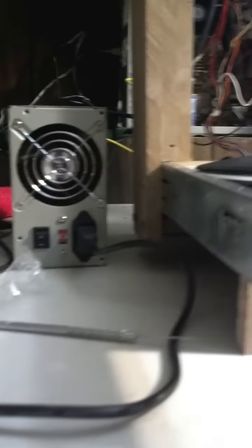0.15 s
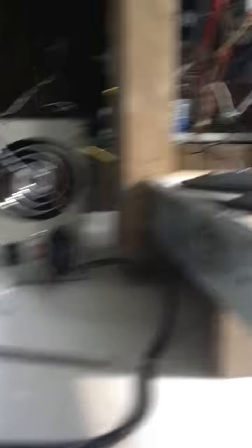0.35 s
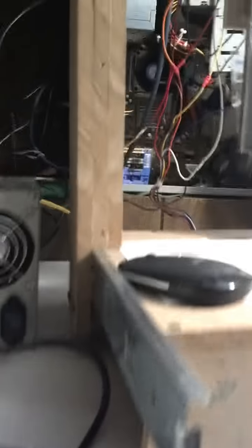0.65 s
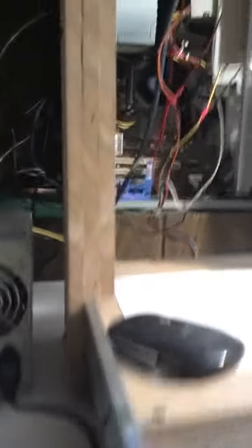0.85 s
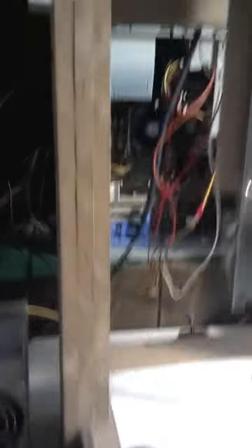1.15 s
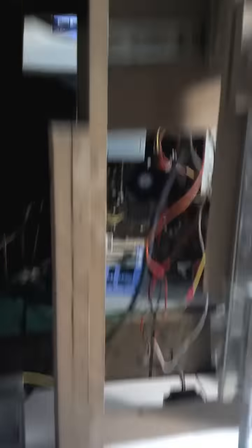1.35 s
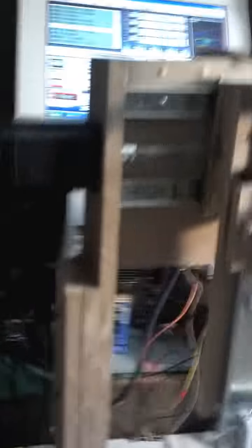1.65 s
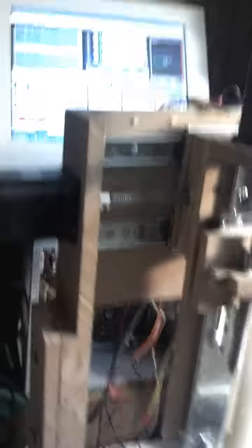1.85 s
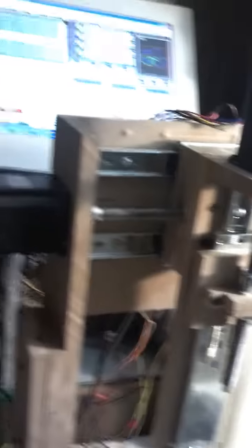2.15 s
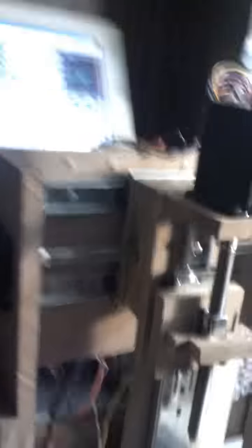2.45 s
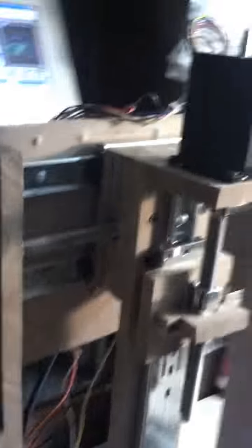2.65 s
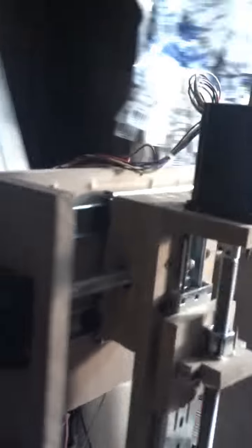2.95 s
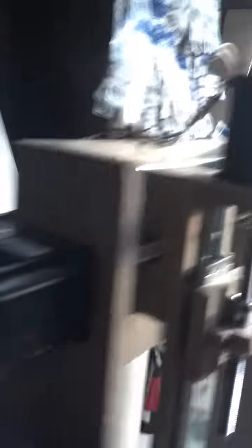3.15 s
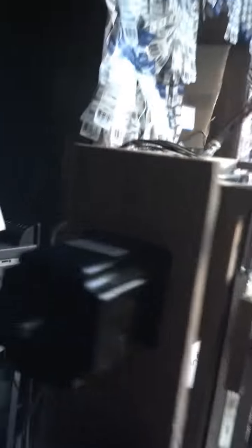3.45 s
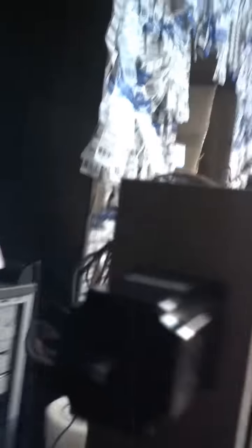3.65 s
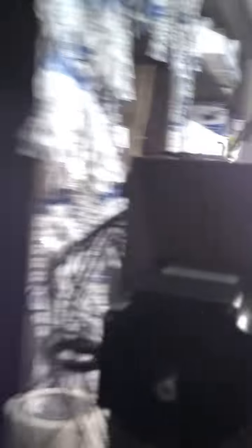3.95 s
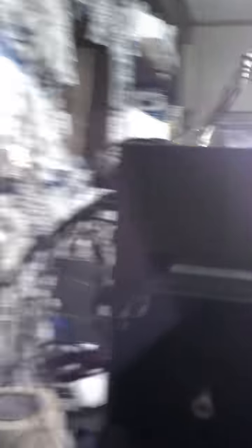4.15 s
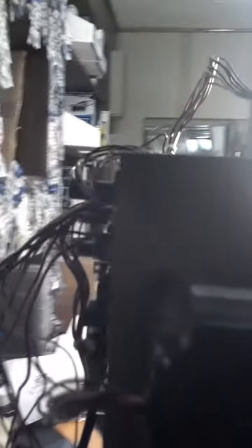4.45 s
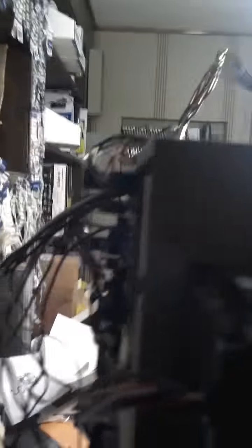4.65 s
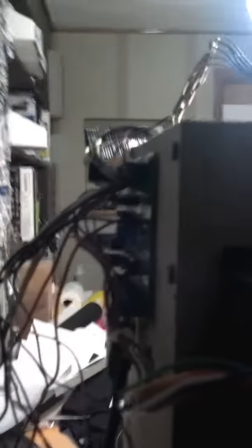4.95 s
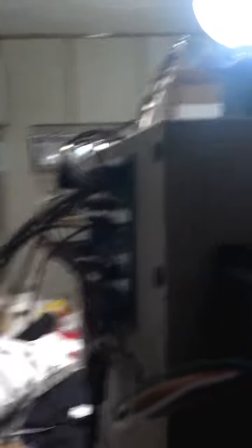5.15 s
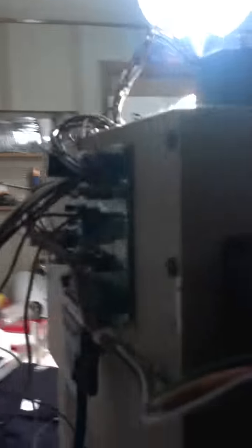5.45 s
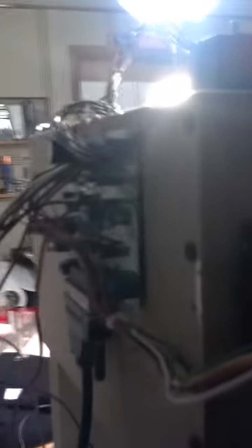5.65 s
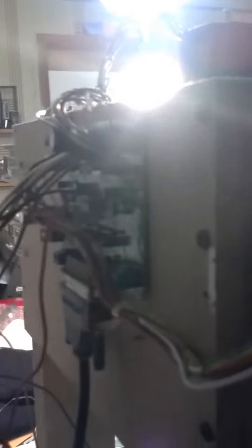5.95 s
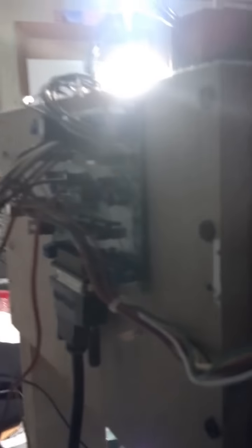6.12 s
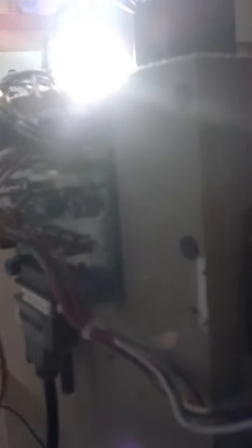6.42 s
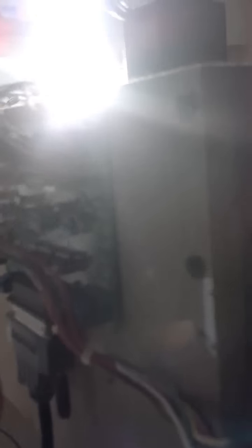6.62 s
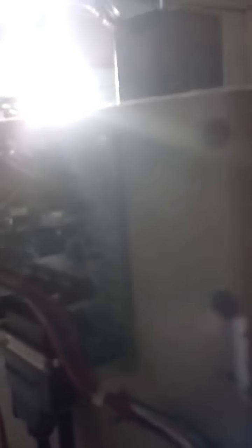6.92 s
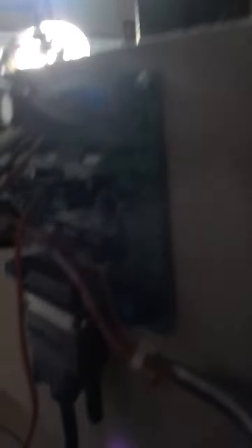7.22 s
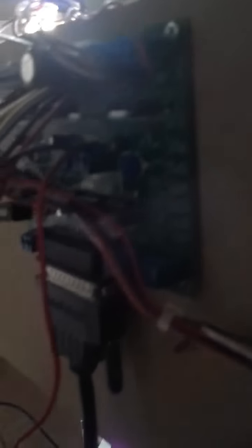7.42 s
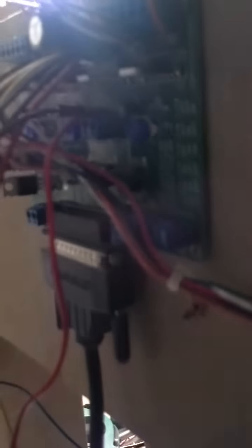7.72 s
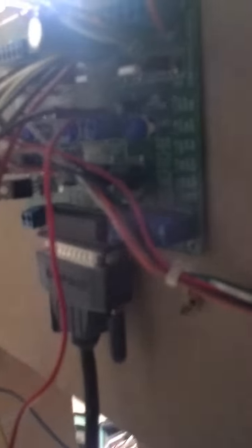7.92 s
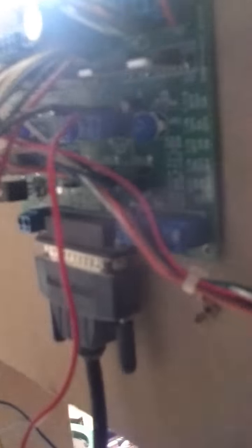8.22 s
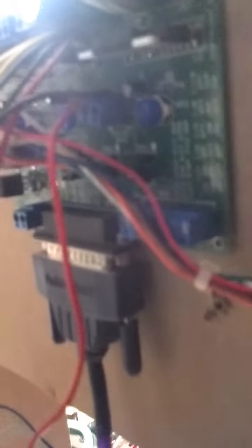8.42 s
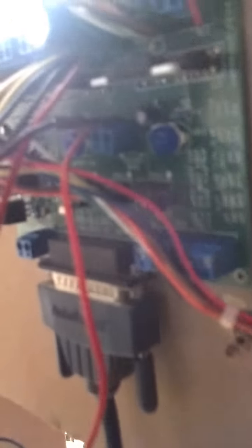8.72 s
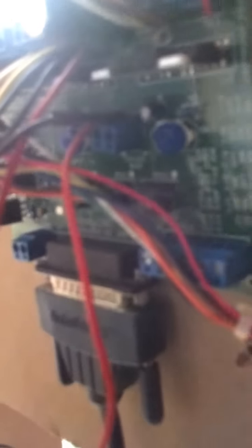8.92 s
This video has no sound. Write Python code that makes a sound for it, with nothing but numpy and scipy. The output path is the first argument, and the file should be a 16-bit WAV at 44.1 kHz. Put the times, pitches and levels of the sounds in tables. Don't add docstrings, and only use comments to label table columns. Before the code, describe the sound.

A gritty mechanical whine around 1.3 kilohertz runs, slides down and is replaced by another motor's rising tone; a finger taps the microphone. The tones swap again with a low table thud, then sharp rattles and metallic ringing cluster near six seconds. The motor winds down, pauses, then two voices bend in steps. Near, indoor, wide stereo sound with faint hum and thin hiss.

```python
import sys
import numpy as np
from scipy import signal
from scipy.fft import rfft, irfft, next_fast_len
from scipy.io import wavfile
from scipy.ndimage import uniform_filter1d, map_coordinates

SR = 44100
rng = np.random.default_rng(int(sys.argv[2]) if len(sys.argv) > 2 else 0)


def pcm_store(signal):
    levels = np.round(np.clip(np.atleast_2d(signal), -1, 1) * 32767)
    wavfile.write(sys.argv[1], SR, levels.astype(np.int16).T)


def ratio(d):
    e = np.asarray(d, float) / 20
    return 10 ** e


N = 400428
T = np.arange(N) / SR
HZ = np.fft.rfftfreq(2 * next_fast_len(N // 2 + SR // 4), 1 / SR)
SUM_ONLY = [[1], [0]]


def evened(x):
    return x / np.sqrt(np.mean(x ** 2) + 1e-20)


def read(points, hz):
    f, value = np.transpose(points)
    return np.interp(np.log(hz + 1), np.log(f + 1), value)


def curves(rows):
    s, *columns = np.transpose(rows)
    return [np.interp(T, s, column) for column in columns]


def spell(start_s, stop_s):
    return np.clip(np.minimum(T - start_s, stop_s - T) / .02 + .5, 0, 1)


def add(mix, s, sound):
    part = mix[round(s * SR):][:len(sound)]
    part += sound[:len(part)]


def colour(x, response):
    return irfft(rfft(x, 2 * len(HZ) - 2) * response)[..., :N]


def modes(table):
    return sum(ratio(db) / (1 + 2j * (HZ - hz) / width_hz) for hz, width_hz, db in table)


def slow(rate_hz):
    knots = rng.standard_normal(int(N / SR * rate_hz) + 2)
    return evened(np.interp(T, np.arange(len(knots)) / rate_hz, knots))


def noise(spectrum, flicker_db, rate_hz):
    z = colour(rng.standard_normal((2, N)), ratio(read(spectrum, HZ)))
    return evened(z) * ratio(flicker_db * slow(rate_hz))


def cycle(turns, orders, levels_db):
    place = np.linspace(0, 1, 8193)
    phase = rng.random(len(orders))
    wave = ratio(levels_db) @ np.cos(2 * np.pi * (np.outer(orders, place) + phase[:, None]))
    return np.sqrt(2) * map_coordinates(wave, [turns % 1 * (len(place) - 1)], order=1)


GRIP_HZ = 328


def step_orders(hz, levels, orders, waver_db):
    steps = np.cumsum(hz) / SR
    out = np.zeros(N)
    for level_db, lines in zip(levels, orders):
        multiple, db = np.transpose(lines)
        first = multiple[0]
        waver = waver_db * (slow(25) + 0.91 * slow(120)) + 1.63 * slow(70) * (first > 1.5)
        grip = 1 / (1 + (first >= 1) * (GRIP_HZ / (first * hz + 1)) ** 4)
        out += grip * ratio(level_db + waver) * cycle(steps / 8, np.round(8 * multiple), db)
    return out


STRONG_EDGES = [29, 31, 33, 46, 48, 89, 91, 95, 99]


def current_edges(steps, strong_db, edges_db):
    comb = np.arange(9, 112)
    comb_db = 3 * rng.standard_normal(len(comb)) - 4
    return ratio(edges_db) * cycle(steps / 4, np.r_[comb, STRONG_EDGES], np.r_[comb_db, strong_db])


def uneven_strands(turns, orders, spread_db):
    return cycle(turns, orders, spread_db * rng.standard_normal(len(orders)))


def backlash(steps):
    grain = signal.lfilter([.3], [1, -.7], rng.standard_normal(N))
    return evened(np.exp(-(steps % 1) / 0.34) * grain)


MOTORS_DB = -2


def frame_response(frame, floor_db, deaf_hz):
    radiates = 1 / (1 + (deaf_hz / (HZ + 1)) ** 6)
    ragged_db = 2.6 * evened(uniform_filter1d(rng.standard_normal(len(HZ)), 400))
    floor = ratio(floor_db) / (1 + (HZ / 3900) ** 8)
    return (floor + modes(frame)) * ratio(ragged_db + MOTORS_DB) * radiates


def motor(hz, levels, orders, frame, strong_db, edges_db, ramp_db, screw_db, rasp_db, waver_db, floor_db, deaf_hz):
    steps = np.cumsum(hz) / SR
    out = step_orders(hz, levels, orders, waver_db)
    out += current_edges(steps, strong_db, edges_db)
    out += ratio(levels[2] + ramp_db) * uneven_strands(steps / 4, np.arange(5, 48), 1.6)
    out += ratio(levels[0] + screw_db) * uneven_strands(steps / 32, np.arange(6, 76), 3)
    out += (ratio(levels[2] + rasp_db) + ratio(edges_db + 3.5)) * backlash(steps)
    return colour(out * np.clip(hz / 60, 0, 1), frame_response(frame, floor_db, deaf_hz))


# step_rate_multiple, level_db
X_ORDERS = [
    [(1, 2.5), (1.25, -31)],
    [(.5, 3.5), (.125, -3.5), (.25, -2), (.75, -27), (1.5, -20)],
    [(4, 7), (8, -3), (12, -25), (16, -22)],
    [(2, 1), (3, -7.5)],
]
# mode_hz, width_hz, peak_db
X_FRAME = [(565, 77, 14.5), (710, 62, 3.5), (918, 67, 24), (1004, 8.4, -6.5), (1307.6, 89, 6.5),
           (1600, 180, 4), (1820, 290, 11.5), (2300, 120, 11), (2562, 34, 0.5), (3100, 110, -0.5),
           (4040, 1300, 0), (8700, 1700, -6), (15750, 1500, -3)]
X_EDGES_DB = [3, 4, 4, 5, 0.1, 4, 12, 8, 4]


def x_motor(hz, levels):
    return motor(hz, levels, X_ORDERS, X_FRAME, X_EDGES_DB, edges_db=-77.5, ramp_db=-25.5, screw_db=-48.5,
                 rasp_db=-12.5, waver_db=1.0, floor_db=-28.5, deaf_hz=430)


# step_rate_multiple, level_db
Y_ORDERS = [
    [(1, 0.5), (1.25, -38)],
    [(.125, 2.5), (.25, -11), (.5, -24.5), (.75, -39), (1.5, -38.5), (2, -40)],
    [(4, 5.5), (8, -3.5), (12, -8), (16, -10)],
    [(2, 1), (3, 1.5), (5, -9), (6, -12), (7, -3)],
]
# mode_hz, width_hz, peak_db
Y_FRAME = [(407, 110, -4), (670, 28, 8.5), (953, 30, 6), (1103, 150, 8), (1313, 76, 12), (1458, 294, 15),
           (1963, 54, 18), (2254, 19, 15.5), (3030, 55, -10), (3273, 70, 7.5), (3684, 37, 7),
           (9530, 610, 0), (15400, 2700, -4.5)]
Y_EDGES_DB = [8.8, 9.9, 0.1, 6, 5, 8, 11, 0.1, 5]


def y_motor(hz, levels):
    return motor(hz, levels, Y_ORDERS, Y_FRAME, Y_EDGES_DB, edges_db=-79.5, ramp_db=-44.0, screw_db=-40,
                 rasp_db=-7.5, waver_db=0.9, floor_db=1.0, deaf_hz=130)


FULL_HZ, RAMP_S, TOGETHER_S = 1279, 0.5, 7.68


def axis(moves, outline_hz, near, laws, usual_db):
    hz = outline_hz + sum(FULL_HZ * np.clip(np.minimum(T - a, b - T) / RAMP_S, 0, 1) for a, b in moves)
    both = spell(TOGETHER_S, N / SR + 1)
    ramping = uniform_filter1d((abs(np.gradient(hz)) * SR > 500) * (1 - both), size=2000)
    closer_db = curves(near)[0] - usual_db
    return hz, [usual_db + rest_db + slope_db * hz / 1000 + ramp_db * ramping + both_db * both + share * closer_db
                for rest_db, slope_db, ramp_db, both_db, share in laws]


THROB_DB, THROB_TURN, THROB_SHARP, SHAFT_STEPS = 2.5, 0.14, 3.9, 200


def throb(hz):
    turn = np.cos(np.pi * (np.cumsum(hz) / SR / SHAFT_STEPS - THROB_TURN)) ** 2
    return THROB_DB * (turn ** THROB_SHARP - .3)


# start_s, stop_s
X_MOVES = [(-0.405, 2.126), (4.851, 7.188)]
Y_MOVES = [(2.129, 4.851)]
# corner_s, x_step_hz, y_step_hz, x_overtone_strain_db, y_microstep_strain_db
OUTLINE = [(7.36, 0, 0, 1, -3), (7.68, 808.5, 0, -3, -3), (7.725, 695, 121.5, -14.5, -18),
           (7.76, 605, 211.5, -15, -14), (7.805, 491.5, 328, -23, -5.5), (7.85, 390.5, 400, -19, -23),
           (7.91, 477.5, 397, -7, -19.5), (7.94, 539.5, 392, 3.5, -7.5), (8.005, 678.5, 383, 11.5, -5),
           (8.06, 920.5, 511, -5, -4.5), (8.232, 984.5, 505, 4.5, -1), (8.29, 788.5, 391, -2, 5),
           (8.39, 852, 363.5, 2.5, -6), (8.397, 815, 332.5, 1, 2), (8.47, 904, 319.5, -5, 1),
           (8.54, 982, 304.5, 7, -0.5), (8.548, 1032.5, 319, -13, 0), (8.63, 1156.5, 286, -14, 0),
           (8.71, 1279.5, 255.5, -6.5, -1.5), (8.88, 1280, 257.5, -2, 0.7), (9.08, 1506.5, 170, -10, -6.5)]
# time_s, level_db
X_NEAR = [(0, -64.5), (0.602, -72.5), (1.0, -64), (1.249, -58.5), (1.6, -64.5), (2.1, -55.5), (4.9, -64),
          (5.3, -57.5), (6.001, -60), (6.7, -57.5), (7.2, -58.5), (7.601, -54), (7.9, -54.5), (8.1, -61),
          (8.4, -61), (8.65, -51), (8.849, -47), (9.08, -45.5)]
Y_NEAR = [(2.128, -48), (2.399, -48), (2.7, -52.5), (3.1, -46), (3.4, -43), (3.8, -45), (4.2, -44),
          (4.4, -43.5), (4.6, -41), (4.85, -50.5), (7.7, -40.5), (7.9, -53), (8.1, -49.5), (8.33, -61.5),
          (8.43, -50.5), (8.7, -55.5), (8.852, -60), (9.08, -56.5)]
# rest_db, slope_db_per_khz, ramping_db, both_axes_db, nearness_share
X_LAWS = [
    (0.5, -1.5, 7.5, 9.5, 1),
    (0, 1.5, -4.5, -14.5, 1),
    (7.5, -26.5, -3, 8, 0.35),
    (-13.5, 3.5, -3, 20, 0.16),
    (1, -1, -3, 6, 0.067),
    (16.5, -20.5, -4.5, 3, 0.088),
]
Y_LAWS = [
    (-3.5, 0.5, -0.21, 8, 0.99),
    (7.5, -2, -1.5, 19.5, 0.73),
    (6.5, -24.5, 0.1, 5.5, 0.78),
    (-14.5, -3, -0.5, -10.5, 0.78),
    (-2.5, -4.5, 0.18, -29, 0.66),
    (7, -4, -0.5, -1, 0.42),
]
# time_s, x_step_db, x_slow_db, x_microstep_db, y_step_db
LOAD = [(0.1, 1, -5.5, 10, 0), (.6, 2.5, 1, 0, 0), (1.1, 7.5, -6.5, -6, 0), (1.55, 3, 5, 6, 0),
        (1.75, 2.5, -4, 11, 0), (1.97, -6, 2, -5, 0.1), (2.05, -2, 0.1, -3, 5.5), (2.6, -2, 2, -2, 0),
        (2.7, 0.1, 0.1, 0.1, 1), (4.35, 0.1, -4, -1, 1.5), (4.52, 0.1, 0.1, 0.1, -4),
        (4.6, 0.1, 0.1, -7, 1.8), (4.72, 0.1, -3, -3, -12), (4.9, 2.5, -1, 3.1, 0),
        (6.7, 1.5, -0.1, 3.5, 0), (7.66, -3, -2.5, -1.8, -5.5), (7.74, -2.7, 5.3, -15.5, 3.5),
        (7.88, 0.5, 0.5, -7.5, -7.5), (8.0, -6.5, 2.5, -3.5, -3), (8.1, -2, 3, 4, 2.5),
        (8.22, -0.5, 2.5, -1, 2.5), (8.3, 0.5, -4.5, 0.5, -5), (8.45, -7, 0.1, 4, 6),
        (8.53, -4, -7, -3, -2), (8.64, 4, -10, -2, 8.5), (8.7, 5.5, -2, -5, 0.5), (8.88, -5.5, 4.5, -3, -7),
        (9.0, 4.5, 6, -3, -2)]
X_USUAL_DB, Y_USUAL_DB = -58, -46


def drives():
    x_hz, y_hz, x_strain_db, y_strain_db = curves(OUTLINE)
    x_hz, x = axis(X_MOVES, x_hz, X_NEAR, X_LAWS, X_USUAL_DB)
    y_hz, y = axis(Y_MOVES, y_hz, Y_NEAR, Y_LAWS, Y_USUAL_DB)
    load = curves(LOAD)
    x = [*(x[k] + load[k] for k in range(3)), x[3] + x_strain_db, *x[4:]]
    y = [y[0] + throb(y_hz) + load[3], y[1] + load[3], y[2] + y_strain_db, *y[3:]]
    return (x_hz, x), (y_hz, y)


# mode_hz, width_hz, peak_db
LOOSE = [(374.5, 18, 1.5), (637, 71, -6.5), (1240, 44, -14), (1308, 44, -0.5), (1690, 40, -19)]
# full_speed_hz, level_db
BEARING = [(796.7, -54.5), (915.2, -51), (958.2, -46.5), (995.9, -51.5), (1039, -55.5), (1077, -48.5),
           (1114, -42), (1179, -54.5),
           (1378, -43), (1437, -60.5), (1572, -60.5), (1593, -56.5), (1755, -56.5), (1916, -56)]
LOOSE_DB, BEARING_NEAR = 3, 0.52


def carriage(hz, levels):
    speed = np.clip(hz / FULL_HZ, 0, 1)
    shake = ratio(levels[0] + LOOSE_DB + 1.6 * throb(hz)) * speed ** 6
    move = slice(*[round(s * SR) for s in Y_MOVES[0]])
    turns, tones = np.cumsum(speed[move]) / SR, np.zeros(N)
    for tone_hz, db in BEARING:
        tones[move] += ratio(db) * np.cos(2 * np.pi * (tone_hz * turns + rng.random()))
    near_db = BEARING_NEAR * (curves(Y_NEAR)[0] - Y_USUAL_DB)
    near = ratio(-5.0 + 1.1 * slow(15) + near_db) * speed ** 9
    return shake * evened(colour(rng.standard_normal(N), modes(LOOSE))) + near * tones


# mode_hz, width_hz, peak_db
RAIL = [(1724, 16, -12.5), (1600, 28, -48), (4310, 84, -18.5), (1784, 11, 12.5)]
# peak_s, peak_db, swell_s, t60_s
JOLTS = [(0.97, -48, .03, 0.068), (1.12, -52.5, 0.14, 0.41), (1.958, -32, 0.034, 0.27),
         (2.039, -55, 0.018, 0.26), (5.045, -35, 0.033, 0.52), (5.26, -50.5, 0.11, 0.71),
         (5.77, -37.5, 0.15, .8), (5.875, -24, 0.12, 0.37), (5.925, -22.5, 0.015, 0.1),
         (5.98, -30, 0.083, 0.4), (6.016, -21, 0.029, 0.37), (6.175, -29, 0.11, 0.55),
         (6.27, -36.5, 0.12, 0.6), (6.43, -42, 0.14, 1.2), (6.7, -52.5, 0.46, 2.3),
         (7.03, -45.5, 0.04, 0.26), (7.55, -43, 0.069, 0.44)]
RAIL_HZ = 1812.3


def rail():
    sides = evened(colour(rng.standard_normal(N), modes(RAIL)))
    main = ratio(1.5 * slow(30)) * np.cos(2 * np.pi * np.cumsum(RAIL_HZ + 5 * slow(20)) / SR)
    power, t = np.zeros(N), np.arange(-SR // 2, SR) / SR
    for s, db, swell_s, t60_s in JOLTS:
        fall = np.maximum(-t / max(swell_s, .005), 2 * t / max(t60_s, .05))
        add(power, s - .5, ratio(db - 27.6 * fall) ** 2)
    swing = np.sqrt(power)
    ring = ratio(1.5) * swing * main
    octave = 2.64 * ratio(8.3 * slow(45)) * (ring ** 2 - uniform_filter1d(ring ** 2, 73))
    return ring + octave + ratio(-9.0) * swing * sides


# start_s, peak_db, low_part_db, t60_s
RATTLES = [(0.4938, -49, -19, 0.096), (0.618, -34.5, -4, 0.14), (0.7956, -33.5, -7, 0.31),
           (0.945, -40, -8.5, 1.1), (1.116, -39.5, -5.5, 0.58), (1.178, -34, -3, 0.15),
           (1.209, -45.5, -27, 1.2), (1.265, -55, -23, 0.082), (1.921, -38.5, 2.5, 0.13),
           (3.053, -44.5, 12, 0.17), (3.523, -38.5, 4.5, 0.15), (3.859, -47, 12, 0.19),
           (3.968, -45, 14, 0.16), (4.13, -37.5, 11, 0.22), (4.3024, -32, 5.5, 0.066),
           (4.838, -38, 9, 0.16), (5.075, -38, -20, 0.093), (5.689, -45.5, 4, 1.6),
           (5.759, -31, -4.5, 0.16), (5.866, -39, -13, 0.27), (5.9158, -14, -22, 0.04),
           (6.009, -24.5, -17, 0.11), (6.0791, -47, -2, 0.11), (6.153, -44, 24, 0.2),
           (6.232, -31.5, -6, 0.06), (6.2731, -50.5, 28, 0.21), (7.359, -44, 24.5, 0.065),
           (7.682, -45, 11, 0.77), (7.72, -43, 7.5, 0.38), (7.78, -43.5, 6, 0.63), (7.9, -46.5, 6, 0.48),
           (7.849, -42.5, 12.5, 0.61), (8.057, -43, 7, 0.17), (8.085, -42, 13, 0.19)]
# freq_hz, level_db
CRACK = [(1200, -2), (2000, 11), (3600, 7.5), (5000, 0), (7000, -4.5), (10000, -17), (15000, -37.5)]
KNOCK = [(200, 10.5), (450, 15.5), (900, 11), (1500, 3), (2500, -38)]
KNOCK_BEHIND = [(250, -15), (500, 17), (760, 10.5), (920, 17), (1150, 1.5), (1600, 13), (2500, -23)]
BEHIND_S = 5.5


def rattles():
    crack, knock = np.zeros(N), np.zeros((2, N))
    after = T[:SR // 3]
    for s, db, low_db, t60_s in RATTLES:
        shape = (1 - np.exp(-after / 0.0042)) * ratio(db - 60 * (after / max(t60_s, .02)) ** 1.145)
        add(crack, s, shape)
        add(knock[int(s > BEHIND_S)], s, shape * ratio(min(low_db, 9)))
    knocks = knock[0] * noise(KNOCK, 3.2, 200) + knock[1] * noise(KNOCK_BEHIND, 0.55, 200)
    return ratio(-6.5) * crack * noise(CRACK, 1.3, 400) + ratio(-1.0) * knocks


# start_s, level_db, t60_s
LURCHES = [
    (4.8, -24.5, 0.45),
    (7.16, -31.5, 0.41),
    (7.36, -37, 0.92),
    (7.69, -29, 0.46),
    (8.06, -23.5, 0.52),
    (8.36, -39, 1),
]
# freq_hz, level_db
THUD = [(50, -23), (90, -3.5), (150, -2), (240, -12), (400, -39), (900, -92)]
LURCH_RISE_S = 0.013


def lurches():
    shape, t = np.zeros(N), T[:SR]
    for s, db, t60_s in LURCHES:
        add(shape, s, (1 - np.exp(-t / LURCH_RISE_S)) * ratio(db - 60 * t / max(t60_s, .05)))
    return shape * noise(THUD, 1.8, 25)


BUZZ_S, BUZZ_HZ, BEATS_PER_S, BUZZ_DB = (8.7, 8.89), 1600, 21, -36


def buzz():
    beats = np.cos(np.pi * BEATS_PER_S * (T - BUZZ_S[0] - .015))
    return ratio(BUZZ_DB) * spell(*BUZZ_S) * beats * np.cos(2 * np.pi * BUZZ_HZ * T)


TAP_S, PUSH_DB, TICK_DB = 2.427, -12.5, -22


def tap():
    t = np.arange(900) / SR
    push = ratio(PUSH_DB - 60 * t / 0.016) * np.sin(2 * np.pi * 140 * t + 1.5)
    ticks = np.exp(-t / 0.0019) + 0.5 * np.exp(-abs(t - .005) / 0.00089)
    out = np.zeros(N)
    add(out, TAP_S, push + ratio(TICK_DB) * ticks * rng.standard_normal(len(t)))
    return out


def driven(axes, layer):
    return sum(ratio(levels[layer]) * np.clip(hz / 30, 0, 1) for hz, levels in axes)


# freq_hz, level_db
GRIND = [(150, 8), (400, 10.5), (900, 9.5), (1500, 10.5), (2300, 10), (3600, 5), (5000, -1), (7500, -12.5),
         (11000, -49)]


def grinding(axes):
    return (driven(axes, 4) + ratio(-76.5)) * noise(GRIND, 3.5, 60)


# freq_hz, level_db
TABLE = [(60, -46), (110, 6), (180, 3.5), (330, 4.5), (500, -12), (800, -7), (1500, -50.5)]


def table_rumble(axes):
    return (driven(axes, 5) + ratio(-52.5)) * noise(TABLE, 3.93, 30)


# time_s, level_db
BOARD = [(0, -56.5), (0.75, -54.5), (0.9, -57.5), (1.7, -57), (2.15, -56.5), (2.5, -58.5), (3.4, -61.5),
         (3.9, -56.5), (4.7, -50), (4.9, -60), (5.1, -54), (5.3, -62.5), (6.1, -67), (6.9, -52.5),
         (7.3, -60.5), (7.85, -45), (8.45, -38), (9.08, -41)]
# start_s, stop_s, level_db
CHOPPER = [(0.83, 1.585, 12), (1.603, 2.1, 8.5), (3.6, 4.406, 4), (5.224, 6.71, 6.5), (7.7, 9.1, -2.5)]
# freq_hz, level_db
HISS = [(5000, -21), (7500, 9), (9500, 15.5), (11000, 5), (12800, 25), (13800, -5), (15000, -1)]
TOP = [(12500, -10), (14000, -3.5), (15000, 5.5), (15700, 4.5), (16500, -1)]
SOFTER_START_S, SOFTER_STOP_S, SOFTER_DB = 7.8, 10, -5


def driver_hiss():
    hiss_db = curves(BOARD)[0] + SOFTER_DB * spell(SOFTER_START_S, SOFTER_STOP_S)
    top_db = hiss_db + sum(db * spell(a, b) for a, b, db in CHOPPER)
    return ratio(hiss_db - 11.0) * noise(HISS, 0.86, 43) + ratio(top_db - 5.0) * noise(TOP, .8, 33)


# time_s, level_db
FAN_NEAR = [(0, -50.5), (1.0, -49), (1.4, -49), (4.3, -57.5), (4.8, -41), (6.5, -45.5), (7.2, -39),
            (7.6, -39), (8.4, -29), (9.08, -41)]
FAN_HZ = 118.7


def fan():
    level = ratio(curves(FAN_NEAR)[0] + 1.0 * slow(3.2))
    return level * np.cos(2 * np.pi * np.cumsum(FAN_HZ + 0.68 * slow(5.1)) / SR)


# freq_hz, level_db
ROOM = [(40, -47), (70, -58), (100, -58), (220, -85.5), (500, -66.5), (700, -77.5), (1000, -99.5),
        (2300, -88), (5000, -89.5), (8000, -102), (16000, -104)]


def room():
    return ratio(-43.0) * noise(ROOM, 0.99, 13)


# freq_hz, level_db
PORTS_DB = [(60, -7.5), (150, -16.5), (330, -9), (700, -9), (1000, -2.5), (1400, -1), (1800, 7.5),
            (2040, 2), (2500, -0.5), (16000, 1)]
# freq_hz, turn_rad
PORTS_TURN = [(100, -1.5), (300, -1.4), (500, -0.095), (950, 0.44), (1250, -1.5), (1800, 0.022),
              (2040, -0.5), (2500, 0), (16000, 0)]


def ports(tones, wide):
    echoes = rng.standard_normal(6000) * ratio(-60 * T[:6000] / 0.12)
    late = signal.oaconvolve(tones, echoes / np.linalg.norm(echoes))[:N]
    both = wide[0] + tones + 0.38 * late
    direct = colour(0.47 * wide[0] + 0.68 * tones, np.exp(1j * read(PORTS_TURN, HZ)))
    apart = colour(direct + 0.99 * wide[1] + 0.59 * late, ratio(read(PORTS_DB, HZ)))
    return np.array([both + apart, both - apart])


def scene():
    x, y = drives()
    tones = x_motor(*x) + y_motor(*y) + carriage(*y) + buzz()
    wide = ratio(1.5) * rail() * SUM_ONLY + rattles() + lurches()
    wide = wide + grinding([x, y]) + table_rumble([x, y]) + driver_hiss()
    wide = wide + fan() * SUM_ONLY + room()
    return ports(tones, wide) + tap() * [[1], [0]]


def band_limit(x):
    return signal.sosfilt(signal.butter(12, 17020, fs=SR, output="sos"), x)


LOW_HZ, EDGE_HZ, WIDEN_SAMPLES = 85, 15800, 16


def record(dry):
    band = 1 / np.sqrt(1 + (LOW_HZ / (HZ + 1)) ** 8) / (1 + (HZ / EDGE_HZ) ** 300)
    heard = colour(dry, band)
    other = np.pad(heard[::-1], ((0, 0), (WIDEN_SAMPLES, 0)))[:, :N]
    return band_limit(heard - 0.98 * other)


dry = scene()
out = record(dry)
pcm_store(out)
```